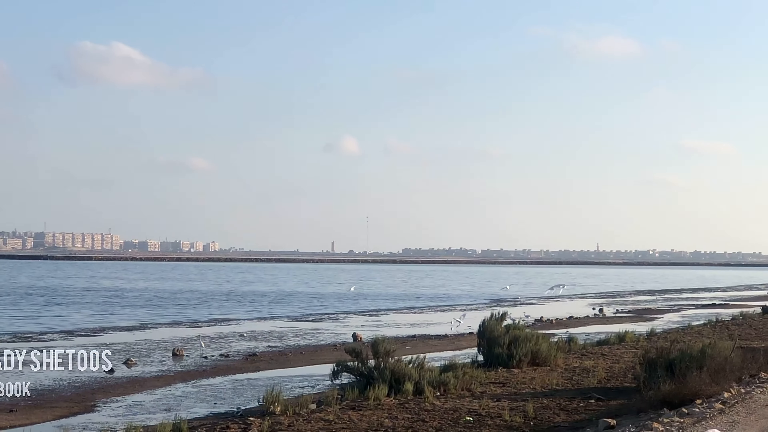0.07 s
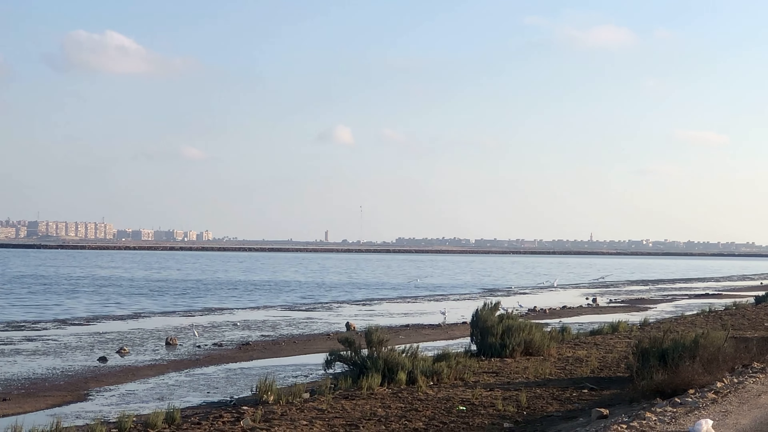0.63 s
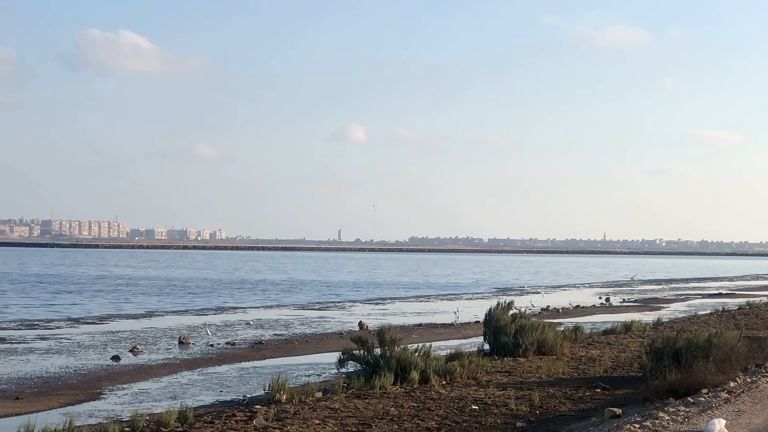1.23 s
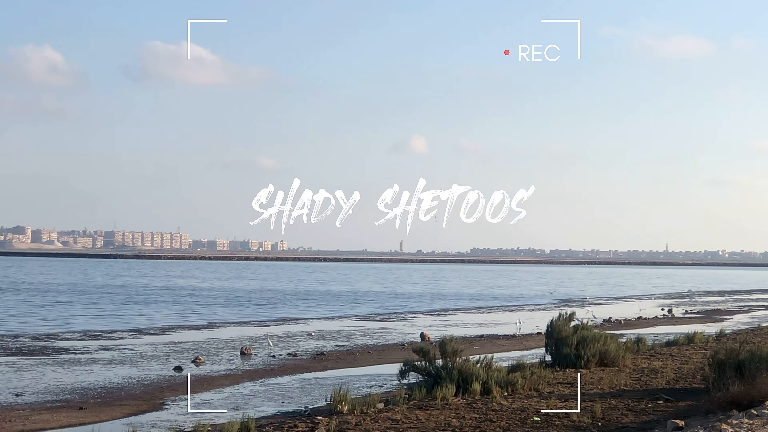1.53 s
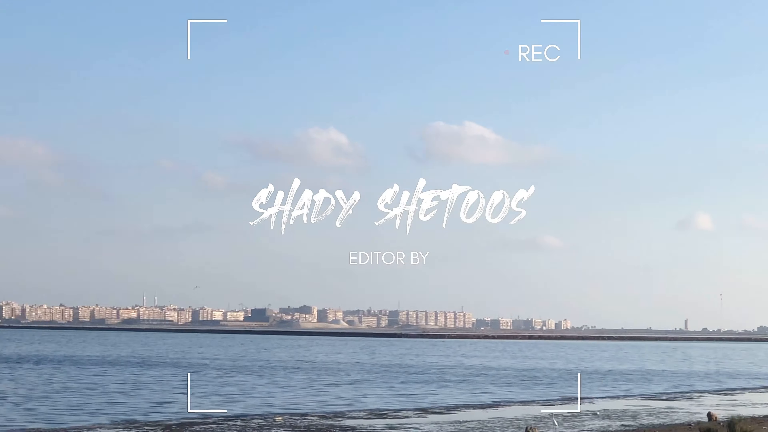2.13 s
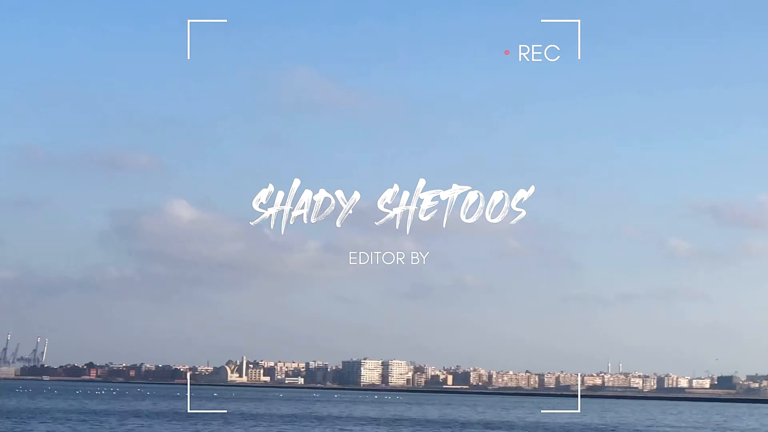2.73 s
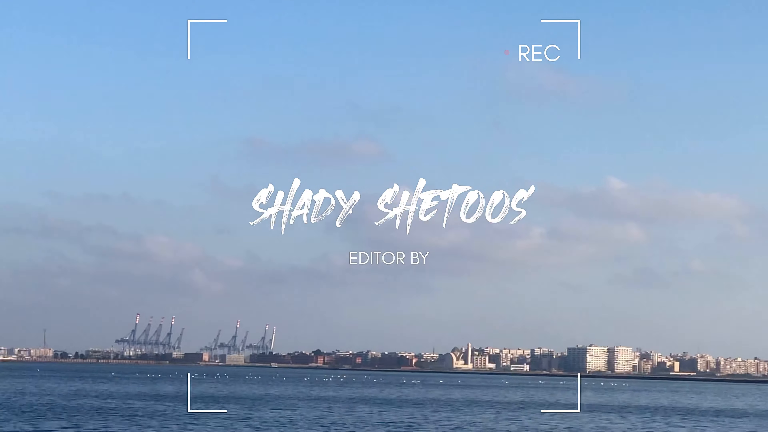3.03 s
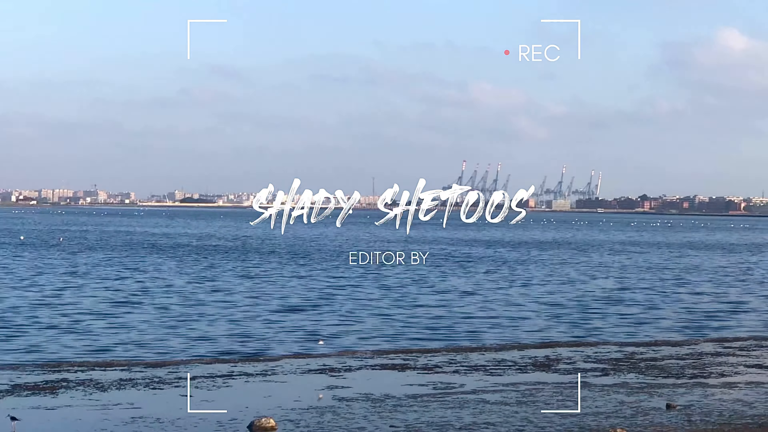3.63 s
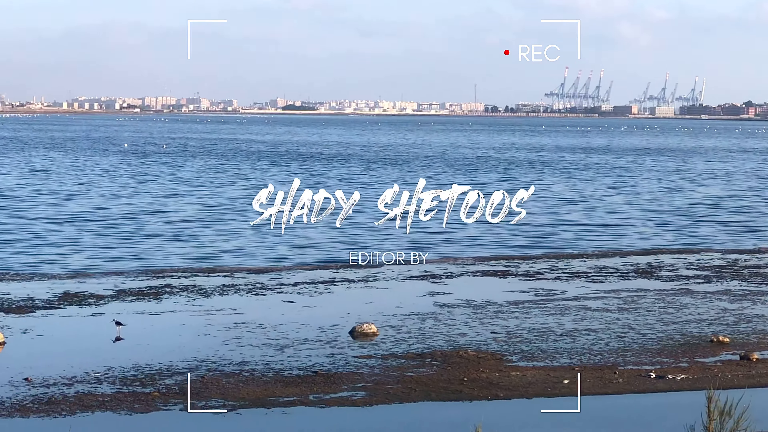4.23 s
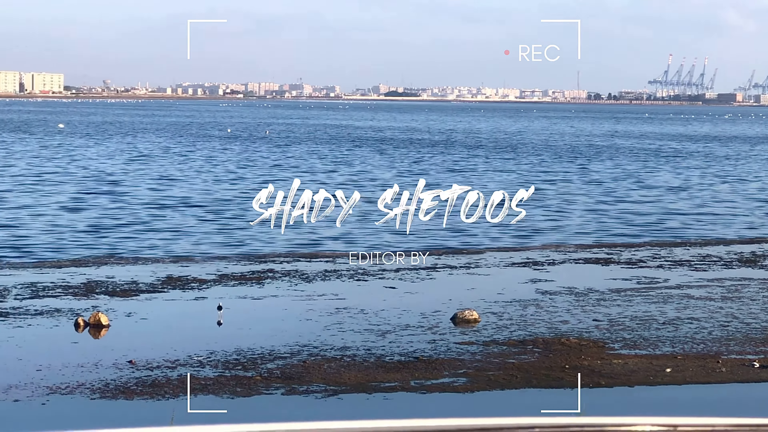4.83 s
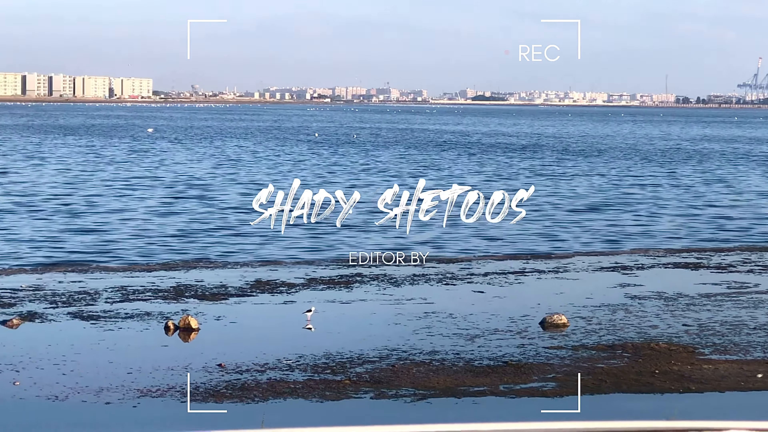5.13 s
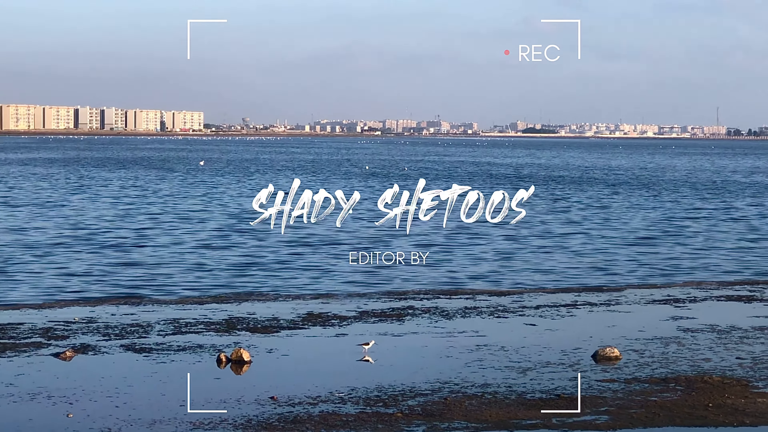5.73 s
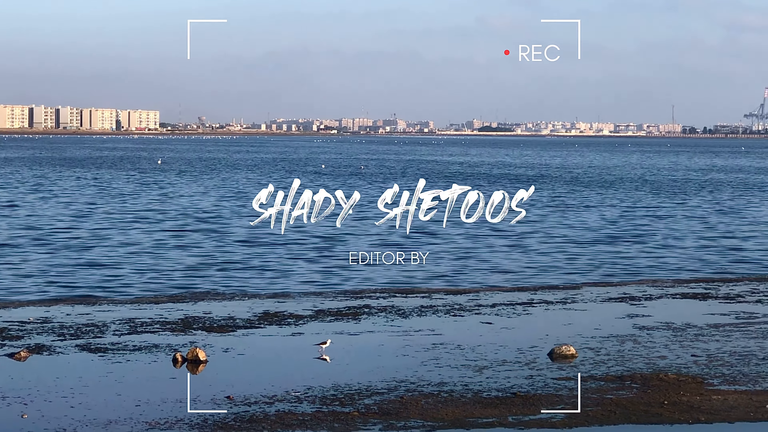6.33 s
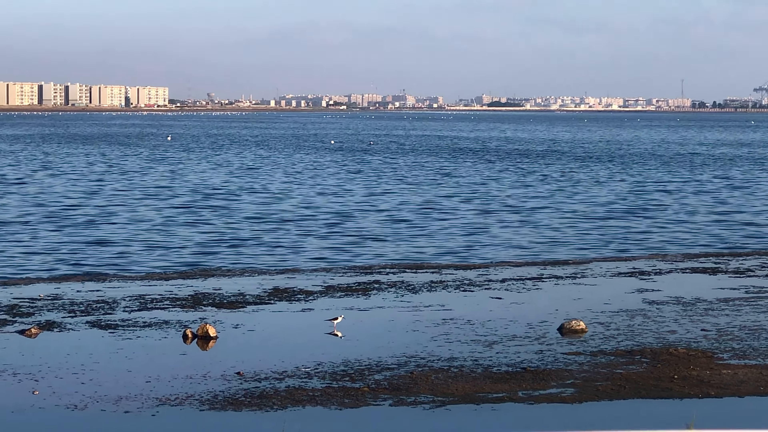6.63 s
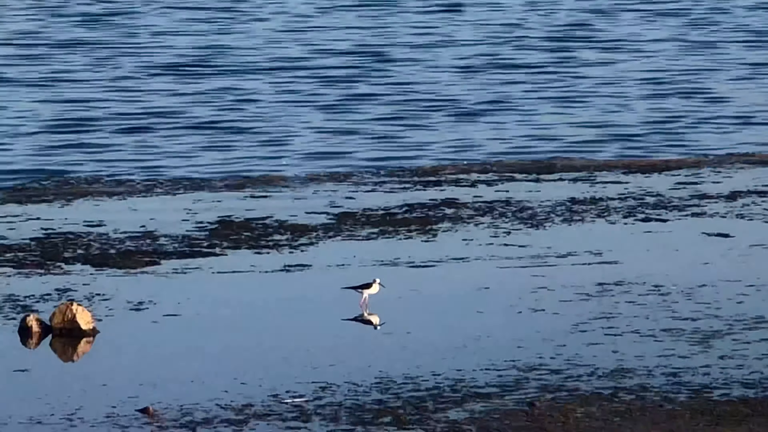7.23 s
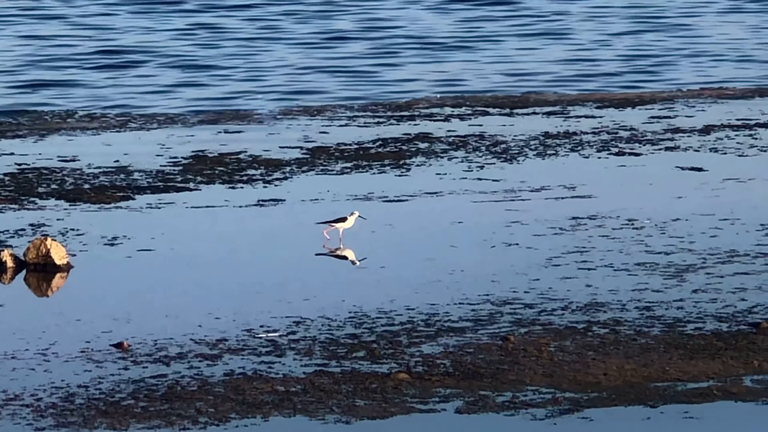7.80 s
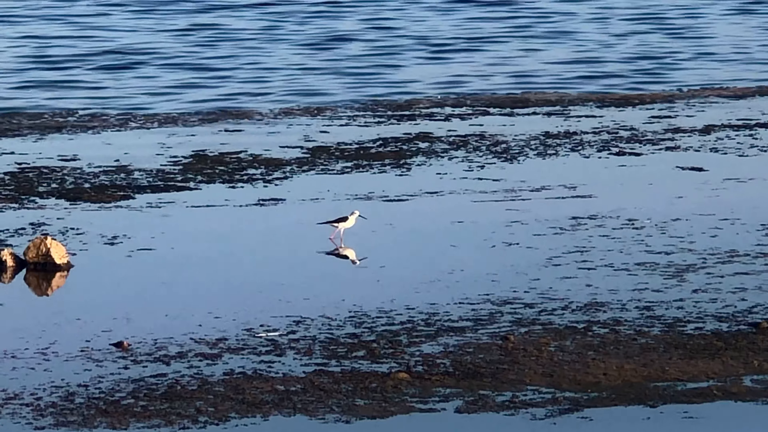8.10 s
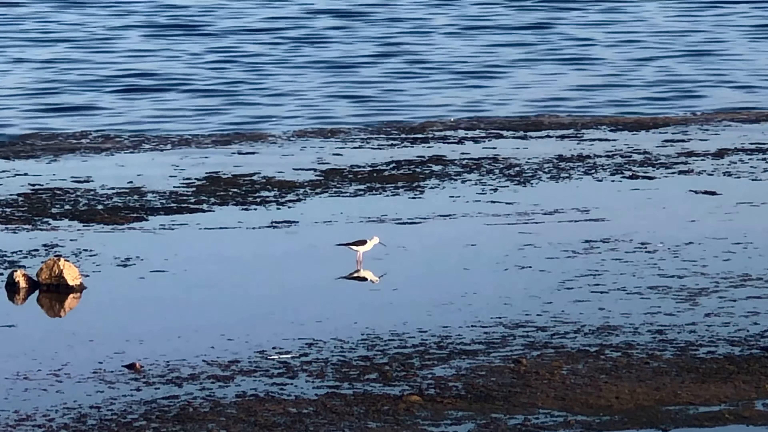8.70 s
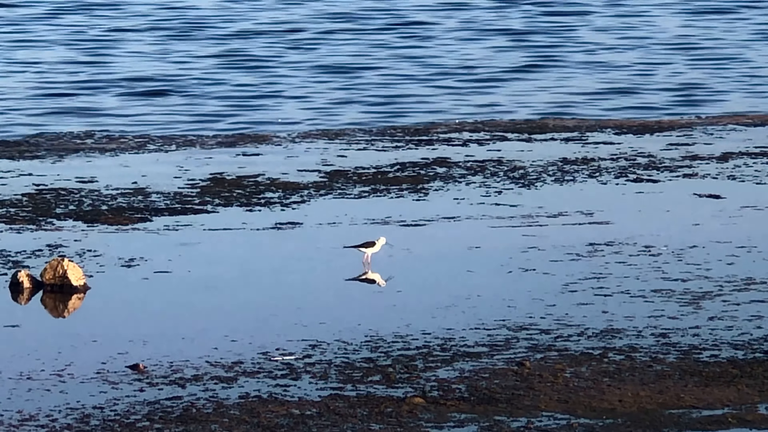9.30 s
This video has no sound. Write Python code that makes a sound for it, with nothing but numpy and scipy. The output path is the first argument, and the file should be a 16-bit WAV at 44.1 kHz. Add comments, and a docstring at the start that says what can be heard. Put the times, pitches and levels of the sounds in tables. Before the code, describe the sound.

Short sharp waterbird calls up close and piping whistles farther off, with low wind buffeting and faint water behind.

```python
"""Shore birds on a windy lagoon

Close to the microphone one bird barks short keks that break from a high register to a low one,
and a second gives quick rising chips. Farther along the shore others pipe arched notes, squeals
and falling slurs, blurred by echo off the bank. Behind them lie small waves on the mud and the hum
of a far town. Gusts buffet the microphone itself with low, lumpy turbulence."""
import sys
import numpy as np
from scipy import signal
from scipy.fft import rfft, irfft, next_fast_len
from scipy.io import wavfile

SR = 44100
rng = np.random.default_rng(int(sys.argv[2]) if len(sys.argv) > 2 else 0)


def persist_wave(psi):
    """Save psi, clipped to +-1, as 16-bit WAV."""
    counts = np.round(np.clip(psi, -1, 1) * 32767).astype(np.int16)
    wavfile.write(sys.argv[1], SR, np.atleast_2d(counts).T)


N = 412776
BAND_LIMIT_HZ = 15750


def amp(db):
    """Decibels to gain."""
    return 10 ** (np.asarray(db) / 20)


def unit(x):
    """Scales to an rms of one."""
    return x / np.sqrt(np.mean(x ** 2) + 1e-20)


def level_at(spectrum, hz):
    """The level in dB of a spectrum, interpolated on a log-frequency axis."""
    f, db = np.transpose(spectrum)
    return np.interp(np.log(hz + 1), np.log(f), db)


def bump(hz, centre_hz, octaves):
    """A bell on the log-frequency axis."""
    return np.exp(-(np.log2((hz + 1) / centre_hz) / octaves) ** 2)


def noise(size, gain):
    """Noise of unit rms with the spectrum gain(Hz)."""
    full = next_fast_len(size + 2048)
    spectrum = rfft(rng.standard_normal(full)) * gain(np.fft.rfftfreq(full, 1 / SR))
    return unit(irfft(spectrum, full)[:size])


def wobble(size, hz):
    """Random wavering of unit rms, up to a rate."""
    return noise(size, lambda f: 1 / (1 + (f / hz) ** 4))


def fade(size, rise_s, fall_s):
    """An envelope with rounded ends."""
    t = np.arange(size) / SR
    rise = np.sin(np.pi / 2 * np.minimum(t / rise_s, 1))
    return rise * np.sin(np.pi / 2 * np.minimum(t[::-1] / fall_s, 1))


def add(mix, start_s, sound):
    """Mixes a sound in at a time."""
    at = round(start_s * SR)
    sound = sound[max(-at, 0):]
    part = mix[max(at, 0):][:len(sound)]
    part += sound[:len(part)]


def play(source, table):
    """Sounds a source once per row: the start time, then its arguments."""
    out = np.zeros(N)
    for start_s, *row in table:
        add(out, start_s, source(*row))
    return out


# Spectrum of town and water, far across the lagoon: f/Hz, relative level/dB
WASH_SPECTRUM = [(50, -31), (90, -10), (165, 2.5), (213, -7.5), (294, -13.5), (463, -16), (727, -20.5),
                 (1250, -21.5), (2200, -27), (3400, -28.5), (4400, -34.5), (7300, -43), (10000, -46.5),
                 (15500, -46)]

def far_wash():
    """Town and water merge into a low, nearly steady wash."""
    return amp(-51.5 + 0.64 * wobble(N, 3.1)) * noise(N, lambda f: amp(level_at(WASH_SPECTRUM, f)))


# Course of an engine's hum in the distance: t/s, f/Hz, level/dB
ENGINE_HUM = [(0, 378, -89), (2.85, 396.3, -72.5), (3.4, 373, -73), (4.5, 370.4, -68), (5.7, 365.3, -62.5),
              (6, 367.2, -76), (9.36, 366, -78)]

def far_engine():
    """One faint tone that drifts in pitch and level."""
    times, hz, db = np.transpose(ENGINE_HUM)
    t = np.arange(N) / SR
    pitch_hz = np.interp(t, times, hz) * (1 + 0.00438 * wobble(N, 4.43))
    tone = np.sqrt(2) * np.sin(2 * np.pi * np.cumsum(pitch_hz) / SR)
    return amp(np.interp(t, times, db) + 3.2 * wobble(N, 8.5)) * tone


# Small waves at the water's edge: crest t/s, length/s, level/dB
WAVELETS = [(2.854, 0.19, -60), (3.601, 0.26, -50.5), (5.325, 0.11, -53.5), (7.05, 0.13, -48.5),
            (7.699, .15, -55.5), (8.772, 0.13, -51)]

def wavelets():
    """Each wave laps on the mud as a soft swell of low noise."""
    out = np.zeros(N)
    for crest_s, length, db in WAVELETS:
        swell = np.hanning(round(length * SR))
        water = noise(len(swell), lambda f: bump(f, 178, octaves=2.08))
        add(out, crest_s - length / 2, amp(db) * swell * water)
    return out


def eddies(size, corner_hz):
    """Turbulent pressure at the microphone; faster eddies reach higher, the port adds a hollow tone."""
    def gain(f):
        port = amp(4.5 * bump(f, 398, octaves=0.42))
        rolloff = np.sqrt((1 + (f / corner_hz) ** 2.93) * (1 + (f / (2.197 * corner_hz)) ** 6))
        return port * f / np.hypot(f, 45) / rolloff
    return noise(size, gain)


# Breeze over the microphone: t/s, relative level/dB
BREEZE_LEVELS = [(0.0, -49), (2.53, -44), (2.82, -51.5), (3.78, -48), (4.04, -56.5), (6.78, -55.5),
                 (7.04, -48), (9.36, -53)]

def breeze():
    """Slow eddies keep up a rumble that swells and sinks."""
    db = np.interp(np.arange(N) / SR, *np.transpose(BREEZE_LEVELS))
    return amp(db + 4.5) * eddies(N, corner_hz=72)


# Gusts on the microphone: t/s, length/s, level before the bass cut/dB, upper corner f/Hz
MIC_GUSTS = [(-.02, 0.13, -31, 149), (0.132, 0.17, -34.5, 119), (.3, 0.11, -27.5, 123),
             (0.421, .13, -27.5, 126), (0.564, .1, -29, 106), (0.651, 0.17, -27.5, 112),
             (1.013, 0.055, -28, 62.5), (1.09, 0.062, -26, 122), (1.158, 0.061, -30, 62.4),
             (1.268, 0.049, -29.5, 62), (1.442, 0.15, -28, 124.5), (1.772, 0.1, -28.5, 106),
             (2.023, 0.12, -20, 124.3), (2.202, .07, -25, 77), (2.346, 0.12, -33.5, 59.4),
             (3.466, 0.044, -26.5, 54.7), (3.705, 0.1, -32.5, 57), (3.885, 0.1, -35, 54.7),
             (6.953, 0.12, -29, 73.7), (7.19, 0.041, -28.5, 58), (7.317, 0.091, -31, 70),
             (7.638, 0.17, -40.5, 59), (7.883, 0.15, -33, 52.6)]

def gust(length, db, corner_hz):
    """A lumpy swell of turbulence whose small eddies come in quick flurries."""
    size = round(length * SR)
    air = eddies(size, corner_hz)
    large = signal.sosfiltfilt(signal.butter(2, 176, fs=SR, output="sos"), air)
    small = (air - large) * unit(amp(8.5 * wobble(size, hz=25)))
    lumps = amp(2 * wobble(size, hz=21.7))
    return amp(db) * unit((large + small) * lumps) * fade(size, 0.019, 0.029)


# Thumps on the microphone: crest t/s, length/s, level before the bass cut/dB
MIC_THUMPS = [(0.058, 0.032, -28), (.678, 0.02, -25.5), (1.122, 0.011, -33.5), (1.499, 0.038, -35),
              (1.797, 0.0105, -31), (2.078, .024, -20), (2.107, 0.043, -26.5), (2.229, 0.011, -24.5)]

def thumps():
    """Single eddies strike the microphone port."""
    out = np.zeros(N)
    for crest_s, length, db in MIC_THUMPS:
        swell = np.hanning(round(length * SR))
        thump = unit(swell * eddies(len(swell), corner_hz=241)) * np.sqrt(np.mean(swell ** 2))
        add(out, crest_s - length / 2, amp(db) * thump)
    return out


def wind():
    """Breeze, gusts and thumps through the microphone's bass cut."""
    bass_cut = signal.butter(4, 47.7, "highpass", fs=SR, output="sos")
    return signal.sosfilt(bass_cut, breeze() + play(gust, MIC_GUSTS) + thumps())


# Early reflections off the water and the bank: delay/s, gain
SHORE_REFLECTIONS = [(.0047, -0.01), (0.0093, -0.099), (.019, .06)]

def shore(direct, tail_db, t60_s=0.43):
    """Bank and ripples return a few early reflections and scatter a duller tail."""
    t = np.arange(SR // 2) / SR
    tail = noise(len(t), lambda f: 1 / (1 + (f / 9000) ** 4)) * amp(-60 * t / t60_s) * (t > 0.002)
    out = direct + amp(tail_db) * signal.fftconvolve(direct, tail / np.linalg.norm(tail))[:N]
    for delay_s, gain in SHORE_REFLECTIONS:
        add(out, delay_s, gain * direct)
    return out


def syrinx(hz, voice, harmonics):
    """A bird's voice: harmonics on a pitch curve, each weighted by voice(Hz) in dB; unit rms."""
    k = np.arange(1, harmonics + 1)[:, None]
    turns = np.cumsum(hz) / SR + rng.random()
    gains = amp(voice(k * hz)) * (k * hz < BAND_LIMIT_HZ)
    return unit((gains * np.sin(2 * np.pi * k * turns)).sum(0))


def whistle(hz, db, octave_db):
    """An unsteady, slightly hoarse tone on a pitch curve, with its octave and two faint partials."""
    size = len(hz)
    waver = 1 + 0.0032 * wobble(size, 70) + 0.012 * wobble(size, 700)
    phase = 2 * np.pi * np.cumsum(hz * waver) / SR
    tone = np.sin(phase) + amp(octave_db) * np.sin(2 * phase)
    tone += amp(-20.5) * np.sin(1.5 * phase) + amp(-34) * np.sin(3 * phase)
    return amp(db + 1.96 * wobble(size, 70)) * np.sqrt(2) * tone * fade(size, 0.025, 0.04)


def flock(calls_per_s=16):
    """Faint slurs from far out on the flats: many throats, each at its own pitch."""
    rows = []
    for when, length, pitch, distance in rng.random((round(calls_per_s * N / SR), 4)):
        crest_hz = 3188 * 2 ** (0.6 * (pitch - 0.5))
        rows.append((when * N / SR, crest_hz, -82.5 - 4 * distance, 0.06 + 0.091 * length, 0.12))
    return play(slur, rows)


# Slurs from along the shore: t/s, crest f/Hz, level/dB, length/s, fall as a share of the pitch
FAR_SLURS = [(0.225, 4170, -61.5, 0.099, 0.18), (1.322, 3200, -59, 0.085, 0.25),
             (1.524, 3250, -63, 0.079, 0.25), (1.609, 3200, -55.5, 0.065, 0.18),
             (3.929, 3220, -50, 0.072, .25), (8.029, 3240, -51.5, 0.077, 0.32)]

def slur(crest_hz, db, length, fall, hook_s=0.01597):
    """A whistle that hooks up to a crest, then slides down and fades."""
    t = np.arange(0, length, 1 / SR)
    hook = 1 - 0.1186 * np.maximum(1 - t / hook_s, 0) ** 2
    slide = fall * (1 - np.exp(-(np.maximum(t - hook_s, 0) / (0.32 * length)) ** 1.27))
    return whistle(crest_hz * hook * (1 - slide), db - 18 * slide, octave_db=-23)


# Thin far squeals leading into the piped notes: t/s, length/s, second harmonic's final f/Hz, level/dB
FAR_SQUEALS = [(3.002, 0.031, 4120, -67), (3.343, 0.041, 4100, -71), (4.357, 0.047, 4200, -70),
               (5.069, .056, 4080, -61), (5.473, 0.082, 3920, -65), (6.182, 0.058, 4300, -63.5),
               (6.444, 0.11, 4320, -58), (6.596, 0.085, 4350, -58), (9.256, .08, 4100, -65)]

def squeal(length, end_hz, db, rise=0.075, roughness=0.096):
    """A strained, quavering voice, strongest on its second harmonic; jitter smears it to a hiss."""
    size = round(length * SR)
    along = np.linspace(0, 1, size)
    pitch_hz = end_hz / 2 * (1 - rise * (1 - along ** 2))
    quaver = 0.014 * np.sin(2 * np.pi * 19 * length * along)
    jitter = 0.0158 * wobble(size, 39.3) + 0.14 * roughness * wobble(size, 730)
    voice = lambda f: level_at([(2000, -8), (4000, 6), (6200, -8.5), (8200, -19), (11000, -40)], f)
    tone = syrinx(pitch_hz * (1 + quaver + jitter), voice, harmonics=4)
    return amp(db) * tone * fade(size, 0.004, 0.0049)


# Stretches where the far piping voice breaks up into a hiss: t/s, length/s, level/dB
FAR_HISSES = [(2.131, 0.31, -65.5), (2.596, 0.18, -66.5), (4.843, .1, -64), (5.156, .19, -64),
              (5.599, .17, -66.5), (6.548, 0.051, -59), (9.265, .085, -59)]

def hoarse_hiss(length, db):
    """The strained voice without its rise, rough and flickering."""
    hiss = squeal(length, end_hz=3950, db=db, rise=0, roughness=0.647)
    return hiss * amp(2.5 * wobble(len(hiss), hz=30)) * fade(len(hiss), 0.019, 0.019)


# Strength of the octave at the microphone as the piping bird turns: t/s, relative level/dB
OCTAVE_LEVELS = [(1.8, -14), (2.4, -19), (3.05, -1), (3.5, -3.5), (4.3, -14.5), (4.65, -5), (5.3, -11.5),
                 (5.7, -8), (6.1, -1.5), (6.7, -11), (9.3, -19)]
# Piping along the shore: t/s, length/s, top f/Hz, level/dB, closing fall as a share of the pitch
FAR_PIPES = [(.348, 0.036, 5820, -60.5, .12), (1.776, 0.091, 3170, -52.5, 0),
             (1.88, 0.092, 3125, -52.5, 0.0085), (1.975, .08, 3220, -67.5, 0.015),
             (2.068, .11, 3140, -53, 0), (2.174, 0.087, 3130, -53, 0.014),
             (2.273, 0.099, 3165, -54, 0.0046), (2.374, 0.1, 3134, -53.5, 0.21),
             (2.62, 0.088, 3084, -57.5, 0), (2.697, .082, 3184, -54, 0.01),
             (3.018, 0.098, 3205, -54.5, 0.015), (3.111, 0.11, 3130, -58, 0.06),
             (3.37, 0.094, 3200, -57.5, 0.012), (3.464, 0.098, 3120, -58, 0.11),
             (4.253, 0.096, 3180, -54.5, 0.14), (4.39, 0.068, 3145, -55.5, 0.057),
             (4.49, 0.16, 3650, -69.5, .04), (4.595, 0.095, 3200, -58.5, 0.0071),
             (4.702, 0.1, 3090, -58.5, 0.0024), (4.84, 0.055, 3180, -62, 0.013),
             (4.92, 0.0347, 3190, -57.5, 0.123), (5.165, 0.072, 3210, -55.5, 0),
             (5.213, 0.052, 3220, -56, 0.12), (5.32, 0.057, 3170, -52, 0.166),
             (5.558, 0.054, 3140, -50, 0.053), (5.631, .07, 3065, -54.5, 0.08),
             (5.709, 0.041, 3090, -52.5, 0), (6.029, 0.065, 3100, -57, 0.013),
             (6.086, 0.043, 3150, -55, 0.0083), (6.227, 0.035, 3170, -50, 0.14),
             (6.529, 0.034, 3230, -47, 0.063), (6.671, 0.04, 3170, -51.5, 0.15), (9.135, .2, 3260, -67, 0)]

def pipes(fall_s=0.0405):
    """Each note starts low and stressed, then climbs into an arch; one that closes a phrase falls away."""
    out = np.zeros(N)
    for start_s, length, top_hz, db, fall in FAR_PIPES:
        t = np.arange(0, length, 1 / SR)
        from_middle = t / length - 0.5
        carries_on = np.clip(1 - fall / 0.08, 0, 1)
        arch = 1 - 0.03 * (2 * from_middle) ** 2 - 0.0368 * np.exp(-t / 0.0097)
        climb = 0.0297 * carries_on * from_middle
        closing = 1 - fall * np.maximum(1 - (length - t) / fall_s, 0) ** 2
        tilt_db = (45 * fall - 2.5 * carries_on) * from_middle
        octave_db = np.interp(start_s, *np.transpose(OCTAVE_LEVELS))
        add(out, start_s, whistle(top_hz * (arch + climb) * closing, db + tilt_db, octave_db))
    return out


# Voice of the second near bird: f/Hz, relative level/dB
CHIP_SPECTRUM = [(1600, -12), (3300, -3.5), (4500, 5), (5200, 3.5), (6400, -8), (8300, -10), (10200, -25),
                 (13000, -40)]

def flick(end_hz, db, bright_db, length=0.021):
    """A quick upward sweep, strongest on its third harmonic."""
    size = round(length * SR)
    sweep = 1 - 0.1894 * np.linspace(1, 0, size) ** 2.05
    hz = end_hz * sweep * (1 + 0.0027 * wobble(size, 600))
    voice = lambda f: level_at(CHIP_SPECTRUM, f) + bright_db * bump(f, 8700, 0.17)
    return amp(db) * syrinx(hz, voice, harmonics=7) * fade(size, 0.014, 0.005)


# Chips near the microphone: t/s, final f/Hz, level/dB, number of flicks
NEAR_CHIPS = [(0.123, 1685, -52, 2), (0.503, 1750, -49.5, 2), (.872, 1756, -49.5, 2), (.979, 1550, -66, 1),
              (1.223, 1786, -49, 2), (1.607, 1766, -47.5, 2), (1.914, 1740, -49, 2), (2.338, 1775, -51, 2),
              (3.069, 1753, -47.5, 1), (3.504, 1720, -49, 1), (4.722, 1630, -52.5, 1),
              (5.545, 1710, -54.5, 1), (5.871, 1780, -61.5, 1), (7.229, 1550, -53.5, 1),
              (7.618, 1570, -51.5, 1), (8.002, 1580, -46.5, 1), (8.435, 1586, -50.5, 1),
              (8.647, 1640, -61, 1), (8.907, 1580, -51.5, 1), (9.073, 1650, -55.5, 1)]

def chips(pair_gap_s=0.0435):
    """A chip is one flick or a pair; the second of a pair is weaker and a little lower."""
    out = np.zeros(N)
    for start_s, end_hz, db, flicks in NEAR_CHIPS:
        paired = flicks > 1
        add(out, start_s, flick(end_hz, db, bright_db=-2 if paired else 4))
        if paired:
            add(out, start_s + pair_gap_s, flick(end_hz * 0.98, db - 9.5, bright_db=4))
    return out


# The barking bird's opening creak and its two registers: f/Hz, relative level/dB
CREAK_SPECTRUM = [(700, -6), (1400, 0.5), (2200, 3), (3700, 0.5), (4800, -27), (7000, -11.5), (8800, -54),
                  (11500, -28), (14500, -39)]
HIGH_SPECTRUM = [(2000, -9.5), (2700, 1), (5500, -8), (8200, -29), (11000, -18), (14000, -31)]
LOW_SPECTRUM = [(600, 6), (1050, -3), (2100, -3.5), (3150, 2.5), (4200, 2), (5300, -9), (6300, -14.5),
                (7400, -14.5), (8400, -38), (9600, -24.5), (11600, -18), (12700, -27), (14500, -37)]
# Keks near the microphone: t/s, high register/s, low register/s, release/s, low-register f/Hz,
# level/dB, lift near 6.5 kHz/dB, lift near 8.4 kHz/dB
NEAR_KEKS = [(0.693, 0.0062, 0.032, .006, 1105, -50, 14.5, -24),
             (1.021, 0.0023, 0.034, 0.0083, 1047, -45.5, -4.5, 4),
             (1.378, 0.043, 0.00089, .006, 1001, -44.5, -2.5, -4),
             (2.806, 0.0045, 0.03, 0.048, 1024, -45, 8.5, -9),
             (4.44, 0.0028, 0.04, 0.0047, 1062, -47.5, -5, 6),
             (4.782, 0.008, 0.033, .006, 1075, -46.5, 9, -18),
             (5.101, 0.0063, 0.032, 0.0083, 1081, -45, 2, 1),
             (5.414, 0.0069, .031, 0.0042, 1078, -40.5, -9, 0),
             (5.942, 0.0074, 0.026, .006, 1068, -41.5, -3, 6.5),
             (6.375, 0.0022, 0.038, .006, 1140, -45, -1.5, 6),
             (6.767, 0.027, 0.011, 0.0052, 1073, -41, 0, 2.5),
             (7.575, 0.0348, 0.0019, 0.004, 1092, -42, 4.5, 7.5),
             (7.922, 0.025, 0.011, 0.0055, 1074, -40.5, 1.5, 6),
             (8.265, 0.01, 0.022, 0.0065, 1090, -41.5, 3.5, 2),
             (8.683, 0.03, 0.0054, 0.0044, 1052, -40.5, -1.5, -5),
             (8.987, 0.04, 0, 0.0039, 1052, -40.5, 0, -2.5), (9.312, 0.015, 0.013, 0.0069, 1088, -40, 0, 2)]

def kek(high_s, low_s, release_s, pitch_hz, db, bill_db, top_db, creak_s=0.014, high_ratio=2.67):
    """A soft rising creak locks into the high register, which may break down into the low one."""
    def voice(spectrum):
        """A wider bill moves the weight from 4 kHz up towards 6 kHz."""
        bill = lambda f: bill_db * (bump(f, 6450, 0.43) - 0.68 * bump(f, 4100, 0.38))
        return lambda f: level_at(spectrum, f) + bill(f) + top_db * bump(f, 8400, 0.43)

    held_s = creak_s + high_s + low_s
    t = np.arange(0, held_s + release_s, 1 / SR)
    size = len(t)
    since_lock = t - creak_s
    slack = np.maximum(t - held_s, 0)
    creep = abs(1 - t / held_s)
    # tension rises fast, creeps, lets go; the low register settles sooner
    high_glide = 1 - 0.35 * np.exp(-t / 0.016) - 0.032 * creep - 3 * slack
    low_glide = 1 - 0.3 * np.exp(-t / 0.012) - 0.0296 * creep - 3 * slack
    jitter = 1 + (0.0092 + 1.2 * slack) * wobble(size, 330)
    high_hz = pitch_hz * high_ratio * high_glide * jitter
    creak_hz = pitch_hz * 0.9 * high_glide * (1 + 0.05 * wobble(size, 680))
    creak = syrinx(creak_hz, voice(CREAK_SPECTRUM), harmonics=16)
    high = syrinx(high_hz, voice(HIGH_SPECTRUM), harmonics=5)
    low = syrinx(pitch_hz * low_glide * jitter, voice(LOW_SPECTRUM), harmonics=14)

    # at first every other high cycle is weak, which adds a tone between the first two harmonics
    between_hz = 1.5 * high_hz * (1 + 0.024 * wobble(size, 670))
    between = np.sqrt(2) * np.sin(2 * np.pi * np.cumsum(between_hz) / SR)
    doubling = amp(-1.5) * np.exp(-(since_lock / 0.0075) ** 2)
    locked = np.clip(since_lock / 0.0089 + 0.5, 0, 1)
    dropped = np.clip((since_lock - high_s) / 0.0011 + 0.5, 0, 1) * (low_s > 0.005)
    register = high * (1 - dropped) + low * dropped
    tone = locked * ((1 - 0.47 * doubling) * register + doubling * between)

    opening = amp(-6) * np.minimum(t / creak_s, 1) ** 0.74 * np.exp(-np.maximum(since_lock, 0) / 0.0036)
    harshness = amp(-24.5 + 0.78 * bill_db)  # open-billed calls stay harsh
    envelope = amp(db + 1.5 * wobble(size, 75) - 15 * slack / release_s) * fade(size, 0.0029, 0.0046)
    return envelope * ((opening + harshness) * creak + tone)


def scene():
    """One microphone on the shore: near birds are almost dry, far ones blurred, the flock mostly echo."""
    near = play(kek, NEAR_KEKS) + chips()
    far = pipes() + play(slur, FAR_SLURS) + play(squeal, FAR_SQUEALS) + play(hoarse_hiss, FAR_HISSES)
    birds = shore(near, tail_db=-21) + shore(far, tail_db=-15) + shore(flock(), tail_db=8)
    lagoon = far_wash() + far_engine() + wavelets()
    return (birds + lagoon + wind())[None]


def record(dry):
    """The recorder's band limit."""
    lowpass = signal.firwin(511, BAND_LIMIT_HZ, window=("kaiser", 9), fs=SR)
    return signal.oaconvolve(dry, lowpass[None], "same")


dry = scene()
out = record(dry)
persist_wave(out)
```